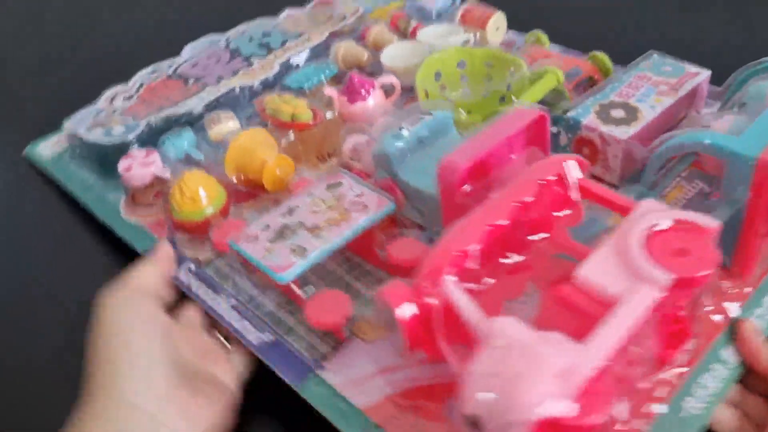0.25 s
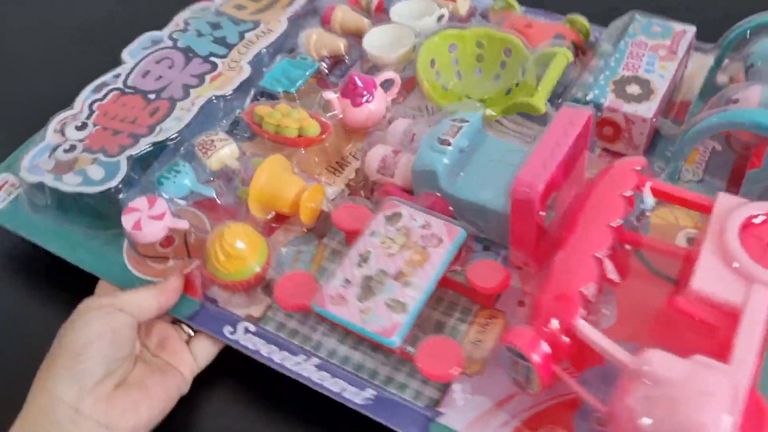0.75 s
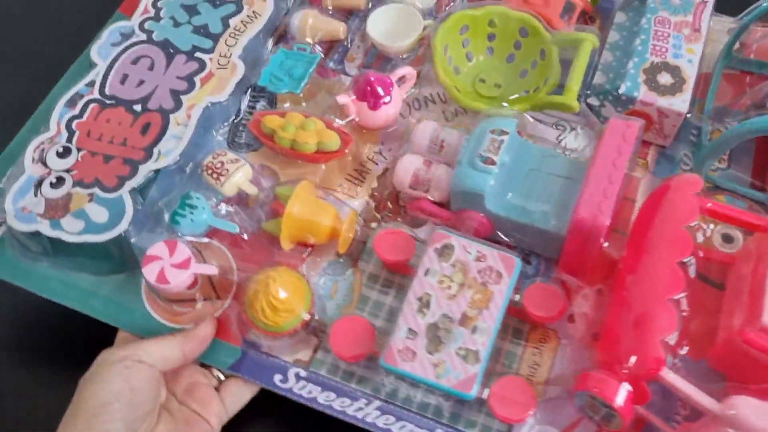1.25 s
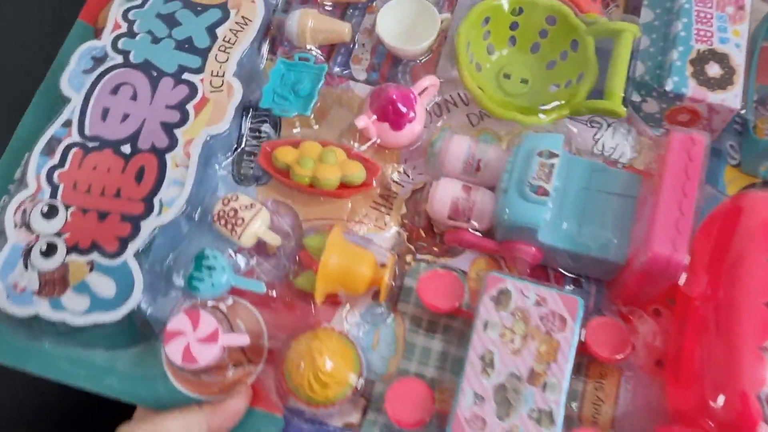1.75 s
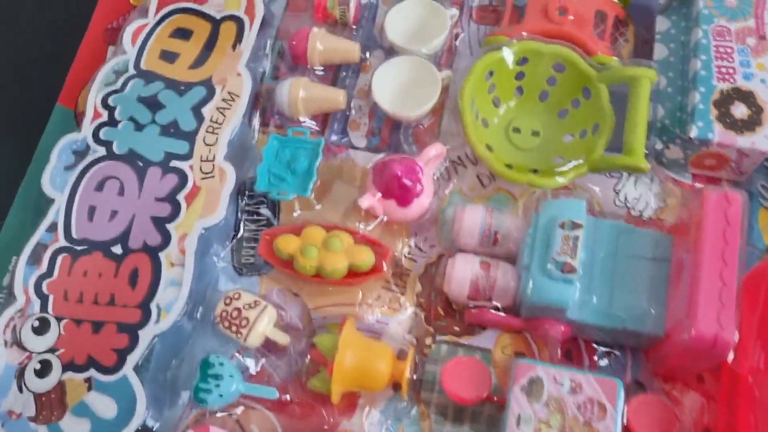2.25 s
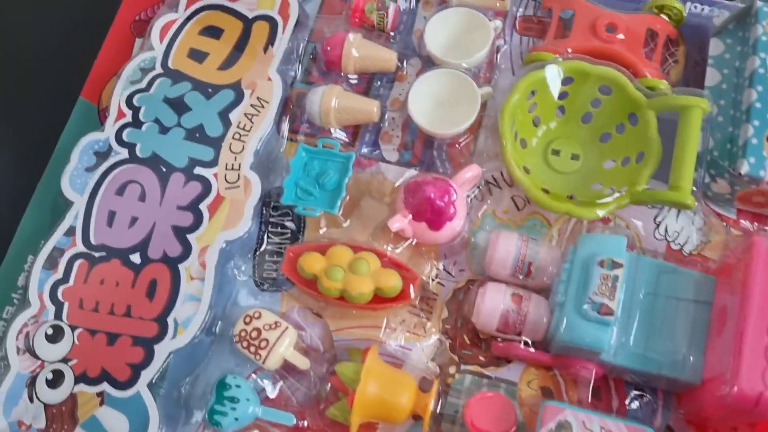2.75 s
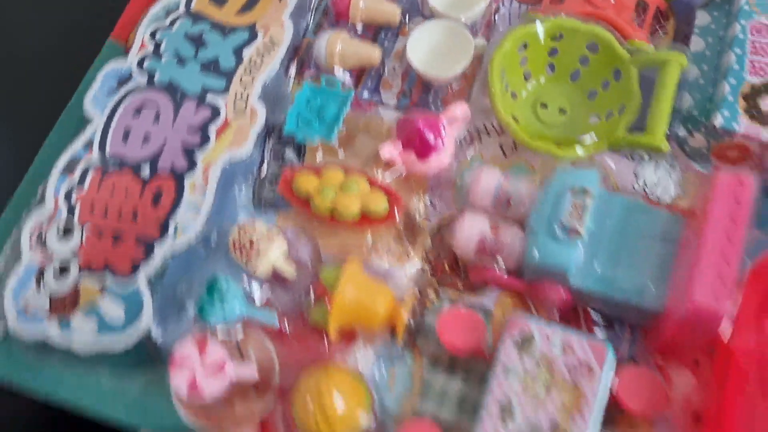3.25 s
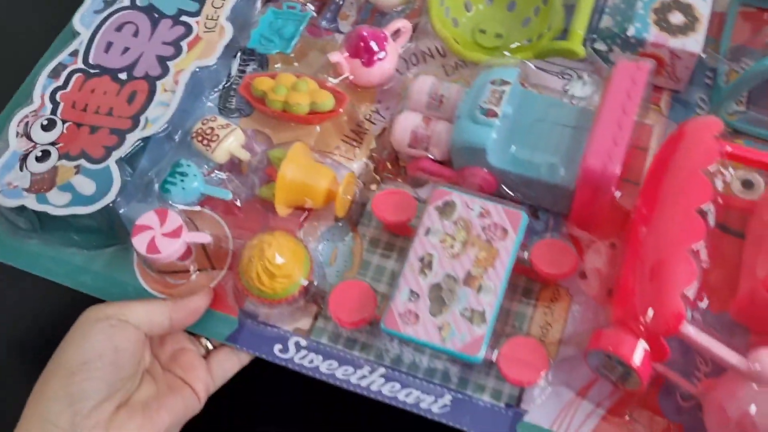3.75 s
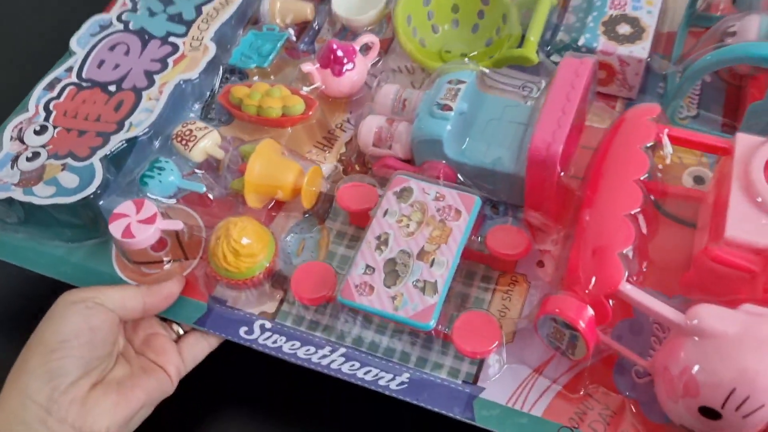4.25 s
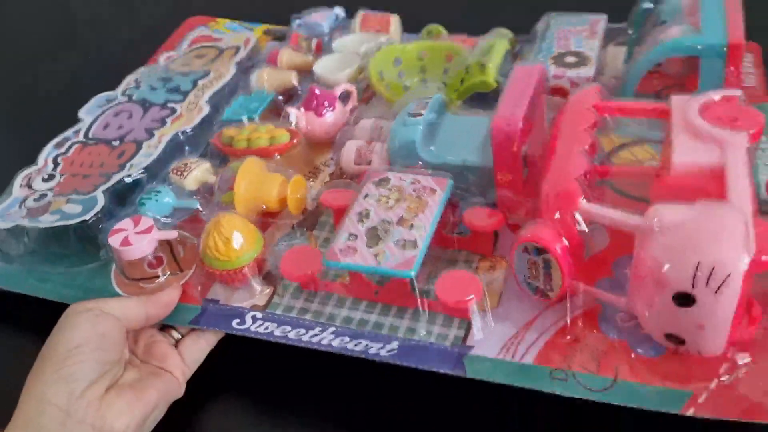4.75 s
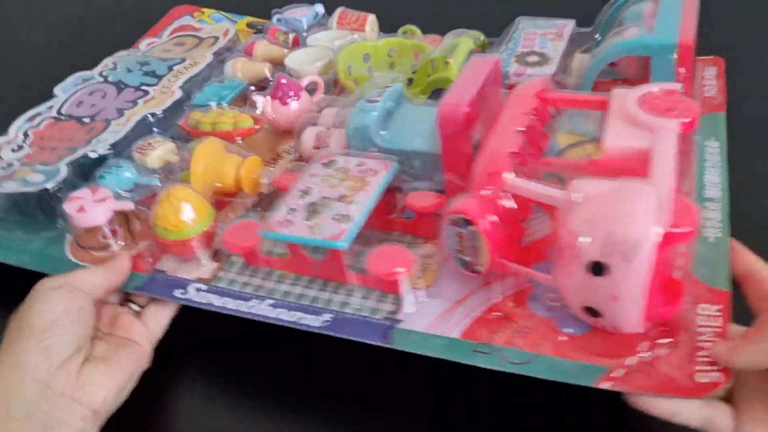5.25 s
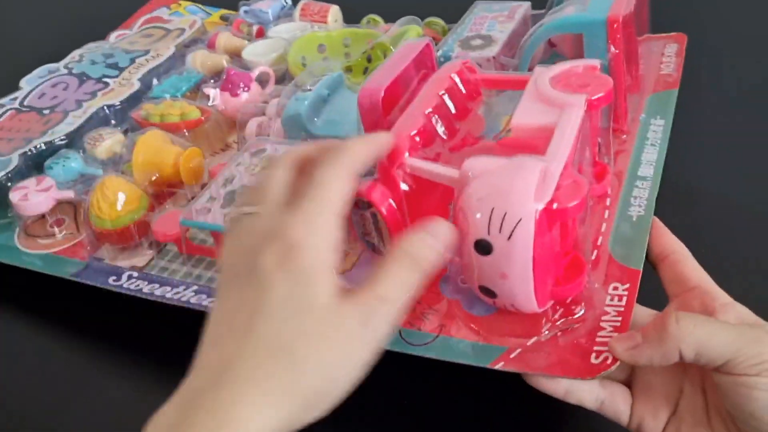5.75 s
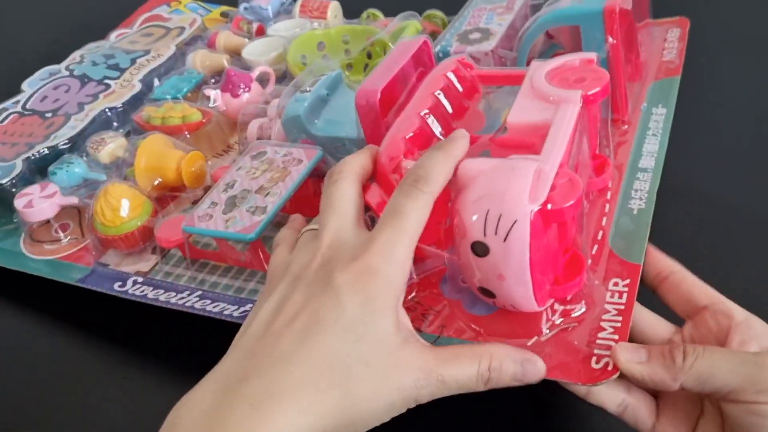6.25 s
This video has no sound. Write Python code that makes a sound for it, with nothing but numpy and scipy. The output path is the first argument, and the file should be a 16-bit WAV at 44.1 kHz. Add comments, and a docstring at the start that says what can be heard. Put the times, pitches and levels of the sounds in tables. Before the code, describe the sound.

Handheld stereo microphone very near a stiff blister pack being tilted and regripped. Dry rubbing and crisp plastic pops come first, with blunt toy knocks around one second. Occasional small taps and soft slides follow in near quiet. Late on, a dense flurry of knocks, snaps and crinkling peaks with a hard pop, then gentle rubbing and a few light snaps finish. Short room reflections, faint hum and hiss beneath.

```python
"""A big blister pack of toys is lifted, tilted and gripped close to a handheld microphone in a small room.
It opens with rubbing fingers (clumped noise grains), shell snaps (ringing noise bursts) and a card thud (low noise);
from 0.7 s loose toys knock in their pockets (short blunt bursts), then come sparse taps and small snaps.
From 4.7 to 5.6 s the handling is busiest; rubbing, faint crackle and a few snaps lead to the end at 6.5 s.
Rumble, hum and hiss lie beneath throughout, and a decaying noise tail gives the room's reflections."""
import sys
import numpy as np
from scipy import signal
from scipy.fft import rfft, irfft
from scipy.io import wavfile

SR = 44100
rng = np.random.default_rng(int(sys.argv[2]) if len(sys.argv) > 2 else 0)


def put_to_file(sound):
    """Save the sound as 16-bit audio at rate SR, in the file named by the first command-line argument."""
    columns = np.atleast_2d(sound).T  # one column per channel
    safe = np.clip(columns, -1, 1)
    whole_steps = np.round(safe * 32767)
    wavfile.write(sys.argv[1], SR, whole_steps.astype(np.int16))


N = 287091
TIME = np.arange(N) / SR

# Low rumble at the microphone: t/s, level/dB
RUMBLE_CURVE = [(0.0, -73), (2.55, -71), (3.14, -61), (4.22, -70), (5.35, -52), (6.07, -72), (6.24, -57),
                (6.51, -65)]
# Hum in the room: t/s, level/dB
HUM_CURVE = [(0.0, -65), (1.1, -58), (2.3, -66), (3.1, -58.5), (4.4, -56.5), (4.6, -63), (6.51, -61.5)]
# Spectrum of the room's hiss: f/Hz, level/dB (per Hz)
HISS_SPECTRUM = [(47, -22), (80, 0.5), (201, -5.5), (482, -16.5), (613, -23), (780, -13.5), (2330, -24),
                 (3100, -23.5), (7440, -38), (15000, -40)]
# Hands slide, tilt or regrip the pack: start t/s, length/s, rub level/dB, crinkle level/dB (both before trim)
HAND_MOVES = [(0.0, .1, -46, -56), (0.15, .54, -57, -54), (0.305, .07, -43, -54), (0.72, .42, -56, -60),
              (1.26, .5, -59, -73), (1.9, .52, -68, -80), (2.66, .17, -67, -70), (3.35, .57, -67, -74),
              (4.18, .28, -73, -78), (4.56, .16, -61, -70), (4.72, .73, -47.5, -56), (4.75, .015, -37, -49),
              (5.52, .09, -56, -49), (5.81, .03, -54, -74), (5.86, .35, -65, -74), (6.06, .12, -68, -66),
              (6.21, .28, -52, -64)]
# Spectrum of skin on card and plastic: f/Hz, level/dB (per Hz)
RUB_SPECTRUM = [(65, -42), (110, -1.5), (156, -6.5), (267, -7), (496, -5.5), (567, -2), (637, -8),
                (1070, -1.5), (1650, -12.5), (2470, -13), (6000, -25), (7800, -55), (13200, -120)]
# Spectrum of the shell's fine crackle: f/Hz, level/dB (per Hz)
CRINKLE_SPECTRUM = [(2000, -2), (3500, 4.5), (6000, -3), (10000, 0.5), (15000, -9)]
# Resonances of the shell on its card: f/Hz, width/Hz, level/dB
SHELL_MODES = [(400, 45, 6.5), (484, 18, 5.5), (744, 42, 3), (830, 50, 2.5), (942, 60, 3.5), (1197, 63, 3),
               (1560, 120, 1), (2005, 120, 2.5), (3140, 330, 2), (4530, 150, -12), (6250, 200, -5),
               (8910, 730, 7)]
# Reflections of the room: f/Hz, t60/s, reflected level/dB
ROOM_DECAY = [(150, 0.65, -13), (400, 0.25, -8.5), (1000, 0.26, -8.5), (3000, 0.28, -8), (7000, 0.25, -6),
              (14000, .25, -8.5)]
# Facets of the shell pop over: t/s, level/dB (at 700-1800 Hz), body/dB, bite/dB (both relative to the level),
# ring f/Hz, left-right/dB
SHELL_SNAPS = [(0.0565, -23, -8, 2, 2250, -1), (0.068, -27.5, -2, -6, 1670, 0),
               (0.0985, -34.5, -4, -5, 530, -3), (0.2547, -57.5, -15, 12, 3520, -2),
               (0.3969, -34, -12, -3, 1610, -5), (0.4226, -37, -5, 3.5, 970, 0),
               (0.5347, -28.5, -8, -.5, 830, 2), (0.5795, -43, -15, 3.5, 1640, -2),
               (0.6217, -56, -14, 9, 3800, -1), (0.6339, -46, -18, 4, 1700, 2),
               (0.6841, -33, -9, .5, 716, -4), (0.954, -42.5, -20, 3, 1160, 0),
               (0.9707, -33.5, -9, -3, 1510, -6), (0.9866, -29.5, -14, -9, 815, -9),
               (0.9947, -28.5, -.5, -3.5, 700, -11), (1.0065, -29, -1.5, -7, 970, 6),
               (1.5341, -53, -3.5, -1.5, 1210, -1), (2.1805, -36.5, -5, -3, 1770, -3),
               (2.4745, -60, -14, 1, 890, 2), (2.6176, -34.5, -17, 1, 1000, -2),
               (3.1579, -59.5, -3, 1, 2090, -4), (3.2407, -42.5, -14, -2.5, 1920, 0),
               (3.8337, -35, -12, -4, 985, 0), (4.7805, -26.5, 1, -1, 510, -1),
               (4.8192, -25, -12, -8, 740, -1), (4.9911, -33.5, -11, -3, 1100, -2),
               (5.0952, -33, 1, 5, 3420, -4), (5.104, -31.5, -2, -10, 583, -2),
               (5.1744, -33.5, -10, 1, 1750, -1), (5.1888, -34, -7, -2, 630, 2),
               (5.2503, -43.5, 0, 11, 3640, 0), (5.2699, -21, -5, -2.5, 1050, -2),
               (5.5205, -19, -2.5, 1.5, 3120, -3), (5.644, -44, -7, 2, 1780, 1),
               (6.0433, -38, 1, 0, 1070, 0), (6.3235, -38, -2, -5, 1820, -1),
               (6.3615, -35, -7, -13, 1000, -2), (6.369, -43, 4, 2.5, 1000, 3),
               (6.4122, -43, -14, 0, 1330, -1), (6.4776, -35.5, 3, -15, 466, 4)]
# Edges of the body, level, bite and air ranges: f/Hz
RANGE_EDGES = [270, 700, 1800, 4500, 16000]
# The backing card flexes or is patted: t/s, level/dB, pitch f/Hz
CARD_THUDS = [(0.057, -45, 190), (0.703, -50.5, 200), (1.007, -35, 188), (1.232, -50, 170),
              (2.183, -41.5, 213), (4.776, -38, 210), (5.095, -44, 188), (5.269, -49, 202),
              (5.523, -40, 199), (6.048, -36.5, 136)]
# Stiff toys and taut pockets ring on: t/s, pitch f/Hz, starting level/dB (before the side balance), t60/s
TOY_RINGS = [(0.057, 510, -44, .2), (2.28, 4090, -68, .4), (2.618, 4790, -57, .7), (2.622, 8790, -64, .4),
             (3.363, 950, -25, .02), (4.457, 1990, -48, .2), (4.82, 820, -33, .1), (5.523, 392, -17, .065)]
# Loose toys knock against their pockets: t/s, level/dB (at 700-1800 Hz), bite/dB (relative to the level),
# ring f/Hz, left-right/dB
TOY_KNOCKS = [(0.7021, -22, -12, 1110, -1), (0.709, -27.5, -17, 1180, -7), (0.8983, -33, -13, 716, -4),
              (1.0639, -35.5, -3, 2720, -6), (1.2314, -30, -8.5, 1035, -4), (1.8572, -51.5, -7, 1220, -3),
              (2.021, -57, 2, 1800, -1), (2.1346, -53, -5, 1000, -1), (2.2796, -35, -6, 1200, -10),
              (2.7644, -48, -5.5, 1010, 0), (2.8676, -51.5, -3, 1060, -1), (3.2232, -48, -6, 1100, -2),
              (3.2714, -50.5, -16, 1260, -7), (3.363, -29.5, -10, 953, -7), (3.9854, -50.5, -16, 1210, 8),
              (4.0049, -53, -5, 1240, -1), (4.0839, -50.5, -8, 1230, 0), (4.4569, -35.5, 6, 2280, -3),
              (4.6366, -41, -7, 1130, -5), (4.775, -18.5, -5, 938, -8), (4.8851, -36, -11, 660, 1),
              (5.242, -35, 1, 1550, -5), (5.3607, -30.5, -13, 1240, 6), (5.381, -41, -4, 1420, 1),
              (5.4581, -26.5, -2, 1180, 3)]

# Faint ticks: typical level at the reference rub, and how much of the rub's swing they follow
TICK_DB, TICK_REFERENCE_RUB_DB, TICK_FOLLOWS = -58, -62, .7
TICK_BODY_DB, TICK_BITE_DB, TICK_RING_HZ = -8, -7, 1100  # typical values; bite and ring are scattered
TICK_SPREAD_DB, TICK_BITE_SPREAD_DB, TICK_RING_SPREAD_OCTAVES = 2.5, 4, .45
# Snaps: top octaves against the bite; decay at equal body and level, doubling for each step of body
SNAP_AIR_DB, SNAP_DECAY_S, SNAP_DOUBLING_DB = -6.5, .0056, 13
# Knocks are small and blunt: little bass, little air against the bite, short
KNOCK_BODY_DB, KNOCK_AIR_DB, KNOCK_DECAY_S = -13, -20, .003


def from_db(db):
    """Decibels to gain."""
    return 10 ** (np.asarray(db) / 20)


def rms_one(x):
    """Scale to rms 1."""
    return x / np.sqrt(np.mean(x ** 2) + 1e-20)


def burst_one(x):
    """Scale a short sound to the energy of 10 ms at rms 1."""
    energy = np.mean(np.sum(x ** 2, axis=-1))
    return x / np.sqrt(energy / (SR / 100) + 1e-20)


def level_curve(rows):
    """Draw straight lines between the points of a level table, one value a sample."""
    seconds, db = np.transpose(rows)
    return np.interp(TIME, seconds, db)


def at_hz(points, hz, column=1):
    """Read a table column on a log-frequency axis."""
    points = np.array(points)
    return np.interp(np.log(hz), np.log(points[:, 0]), points[:, column])


def band(low, high):
    """Steep Butterworth band-pass, third order."""
    return signal.butter(3, [low, min(high, .45 * SR)], "band", fs=SR, output="sos")


def resonate(x, hz, width_hz):
    """One two-pole resonance with a gain of about 1 at its peak."""
    radius = np.exp(-np.pi * width_hz / SR)
    feed = np.array([1, 0, -1]) * (1 - radius ** 2) / 2
    feedback = [1, -2 * radius * np.cos(2 * np.pi * hz / SR), radius ** 2]
    return signal.lfilter(feed, feedback, x)


def colour(x, spectrum):
    """Give a steady sound a spectrum that falls steeply at the low end; rms 1."""
    hz = np.arange(1, N // 2 + 2) * SR / N
    low_cut = 1 + (.7 * spectrum[0][0] / hz) ** 4
    return rms_one(irfft(rfft(x) * from_db(at_hz(spectrum, hz)) / low_cut, N))


def drift(rate):
    """Slow chance: random points of spread 1, rate per second, joined by lines."""
    count = int(N / SR * rate) + 2
    return np.interp(TIME * rate, np.arange(count), rng.standard_normal(count))


def add(out, s, sound):
    """Mix a short stereo sound in at time s."""
    start = max(0, round(s * SR))
    out[:, start:start + sound.shape[-1]] += sound[..., :max(0, N - start)]


def stereo(three, alike):
    """Blend one shared and two separate signals into a left-right pair."""
    alike = np.clip(alike, 0, 1)
    return np.sqrt(alike) * three[0] + np.sqrt(1 - alike) * three[1:]


def background():
    """A low rumble and a wavering hum, each noise through two narrow resonances, over the room's faint hiss."""
    out = from_db(-66) * colour(stereo(rng.standard_normal((3, N)), .41), HISS_SPECTRUM)
    for curve, hz, width_hz in ((RUMBLE_CURVE, 30.5, 8), (HUM_CURVE, 63.2, 17)):
        noise = stereo(rng.standard_normal((3, N)), .99)
        drone = resonate(resonate(noise, hz, width_hz), hz, width_hz)
        sides = from_db([[-1.4], [1.4]])
        out = out + from_db(level_curve(curve)) * rms_one(drone) * sides
    return out


def hand_gains(attack_s=.02, release_s=.045):
    """Each move of the hands swells, holds and dies away: gain of the rub and of the crinkle."""
    gains = 0
    for s, length, rub_db, crinkle_db in HAND_MOVES:
        swell = np.clip((TIME - s) / attack_s, 0, 1)
        release = np.exp(-np.maximum(TIME - s - length, 0) / release_s)
        gains = gains + swell * release * from_db([[rub_db], [crinkle_db]])
    return gains


def slips(per_s, spread_db, smear_s):
    """Tiny stick-slip releases of uneven size come in clumps; each scatters briefly through the sheet."""
    clumping = from_db(4 * drift(14))
    born = rng.random(N) < per_s * clumping / SR
    size_db = spread_db * np.minimum(rng.exponential(1, N), 4)
    energy = born * from_db(size_db) ** 2
    energy = signal.lfilter([1], [1, -np.exp(-2 / (smear_s * SR))], energy + 1e-18)
    return rms_one(np.sqrt(energy) * stereo(rng.standard_normal((3, N)), .51))


def shell(x):
    """The shell's resonances stand out of whatever excites it."""
    return x + sum((from_db(db) - 1) * resonate(x, hz, width_hz) for hz, width_hz, db in SHELL_MODES)


def handling(rub_trim_db=1, crinkle_trim_db=-1, hiss_db=-4):
    """Skin drags over card and plastic in small slips; the strained shell crackles finely."""
    rub_gain, crinkle_gain = hand_gains()
    rub = colour(shell(slips(per_s=380, spread_db=3.6, smear_s=.0035)), RUB_SPECTRUM)
    hiss = from_db(hiss_db) * stereo(rng.standard_normal((3, N)), .4)
    crackle = slips(per_s=100, spread_db=6.5, smear_s=.0015)
    crinkle = colour(crackle + hiss, CRINKLE_SPECTRUM)
    rub = rub_gain * from_db(rub_trim_db) * rub
    crinkle = crinkle_gain * from_db(crinkle_trim_db) * crinkle
    return (rub + crinkle) * from_db([[-1], [1]])  # leans right


def room(x, first_s=.0024, build_s=.0016):
    """Reflections from table and walls: noise tails that die away octave by octave."""
    t, response = np.arange(SR // 2) / SR, 0
    swell = 1 - np.exp(-np.maximum(t - first_s, 0) / build_s)
    for hz in 125 * 2 ** np.arange(8):
        # long waves reach both ports alike
        white = stereo(rng.standard_normal((3, len(t))), 1 / (1 + (hz / 450) ** 2))
        fade = swell * from_db(-60 * t / at_hz(ROOM_DECAY, hz))
        unit_tail = white * fade / np.sqrt(np.sum(fade ** 2))
        tail = signal.sosfilt(band(hz / np.sqrt(2), hz * np.sqrt(2)), unit_tail)
        response = response + from_db(at_hz(ROOM_DECAY, hz, column=2)) * tail
    return signal.fftconvolve(x, response, axes=1)[:, :N]


def ticks(count=32):
    """Tiny snaps at random moments, stronger the harder the hands rub; rows like those of SHELL_SNAPS."""
    moments = (np.arange(count) + rng.random(count)) / count * TIME[-1]
    rub_db = 20 * np.log10(np.interp(moments, TIME, hand_gains()[0]) + 1e-4)
    levels = TICK_DB + TICK_FOLLOWS * (rub_db - TICK_REFERENCE_RUB_DB)
    rows = []
    for s, db, (size, hard, pitch, side) in zip(moments, levels, rng.standard_normal((count, 4))):
        bite_db = TICK_BITE_DB + TICK_BITE_SPREAD_DB * hard
        ring_hz = TICK_RING_HZ * 2 ** (TICK_RING_SPREAD_OCTAVES * pitch)
        rows.append((s, db + TICK_SPREAD_DB * size, TICK_BODY_DB, bite_db, ring_hz, 2 * side))
    return rows


def strike(db, body_db, bite_db, air_db, ring_hz, decay_s, pan_db):
    """One blow on the shell: a crack, then bending waves scatter through the sheet over a brief ring."""
    ring_db, ring_q = 14, 4.13
    rise_s, linger_db, linger_s = .0003, -20, .016
    t = np.arange(SR // 22) / SR
    scatter, sound = rng.standard_normal((3, len(t))), 0
    # a soft contact has little air, and its treble slopes away
    softness_hz = np.clip(32000 * from_db(.55 * (air_db - bite_db)), 6000, .45 * SR)
    softness = signal.butter(2, softness_hz, fs=SR)
    # the shorter the decay, the stronger the crack
    crack = 2.5 * np.exp(-decay_s / .002) * signal.unit_impulse(len(t), round(rise_s * SR))
    ranges = zip(RANGE_EDGES, RANGE_EDGES[1:], (body_db, 0, bite_db, air_db), (1.5, 1.0, .9, .7))
    for low, high, relative_db, lasts in ranges:
        # short waves die first; the whole sheet lingers a little
        fade = np.exp(-t / max(decay_s * lasts, 1e-4)) + from_db(linger_db) * np.exp(-t / linger_s)
        waves = scatter * fade * (1 - np.exp(-t / rise_s))
        waves = waves / np.sqrt(np.sum(waves ** 2, axis=1, keepdims=True))
        waves[0] += crack
        waves = signal.lfilter(*softness, stereo(waves, .62))
        ring = resonate(waves, ring_hz, ring_hz / ring_q)
        waves = shell(waves + from_db(ring_db) * ring)
        part = burst_one(signal.sosfilt(band(low, high), waves))
        sound = sound + from_db(db + relative_db) * part
    sides = rms_one(from_db(np.array([pan_db, -pan_db]) / 2))
    # the left port hears it earlier or later than the right, with the balance
    lead_s = .000035 * np.clip(pan_db - 2, -7, 7)
    left = np.interp(t + lead_s, t, sound[0], left=0)
    return np.array([left, sound[1]]) * sides[:, None]


def snaps():
    """Facets of the shell pop over; wider facets have more body and last longer. Ticks are tiny snaps."""
    out = np.zeros((2, N))
    for s, db, body_db, bite_db, ring_hz, pan_db in list(SHELL_SNAPS) + ticks():
        decay_s = SNAP_DECAY_S * 2 ** (body_db / SNAP_DOUBLING_DB)
        add(out, s, strike(db, body_db, bite_db, bite_db + SNAP_AIR_DB, ring_hz, decay_s, pan_db))
    return out


def thuds(decay_s=.021, q=1.05):
    """The card answers a push with a dull, broad, low resonance."""
    out, t = np.zeros((2, N)), np.arange(SR // 4) / SR
    for s, db, hz in CARD_THUDS:
        push = stereo(rng.standard_normal((3, len(t))), .92) * np.exp(-t / decay_s)
        thud = resonate(resonate(push, hz, hz / q), hz, hz / q)
        add(out, s, from_db(db) * burst_one(thud))
    return out


def toys():
    """Each struck toy or pocket rings as one decaying sine, reaching the two ports out of step."""
    out, t = np.zeros((2, N)), np.arange(SR // 2) / SR
    for s, hz, db, t60 in TOY_RINGS:
        left_lag = 2 * np.pi * hz * .00015  # 0.15 ms as phase
        phases = rng.uniform(0, 2 * np.pi) - np.array([[left_lag], [0]])
        fade = from_db(db - 60 * t / t60) * (1 - np.exp(-t / .0005))
        add(out, s, fade * np.sin(2 * np.pi * hz * t + phases) * from_db([[-2], [2]]))
    return out


def knocks():
    """Loose toys strike their pockets: short, blunt blows that set the shell ringing."""
    out = np.zeros((2, N))
    for s, db, bite_db, ring_hz, pan_db in TOY_KNOCKS:
        air_db = bite_db + KNOCK_AIR_DB
        add(out, s, strike(db, KNOCK_BODY_DB, bite_db, air_db, ring_hz, KNOCK_DECAY_S, pan_db))
    return out


def scene():
    """The pack, its reflections, the ringing toys and the room's own sound."""
    pack = handling() + snaps() + thuds() + knocks()
    return pack + room(pack) + toys() + background()


def record(dry):
    """The top of the treble is cut steeply at 15.7 kHz."""
    return signal.sosfilt(signal.ellip(10, .2, 80, 15700, fs=SR, output="sos"), dry)


dry = scene()
out = record(dry)
put_to_file(out)
```